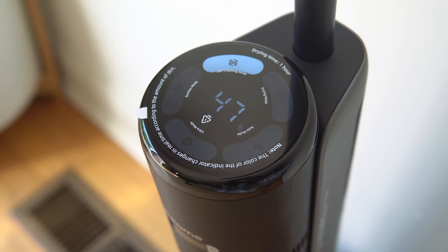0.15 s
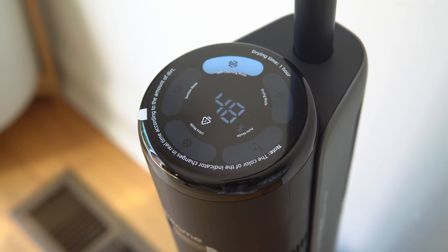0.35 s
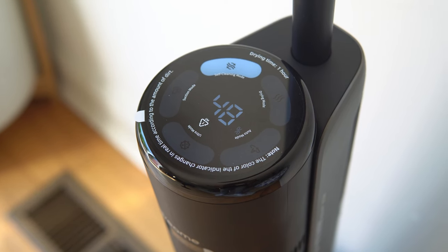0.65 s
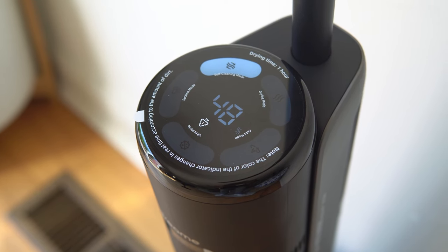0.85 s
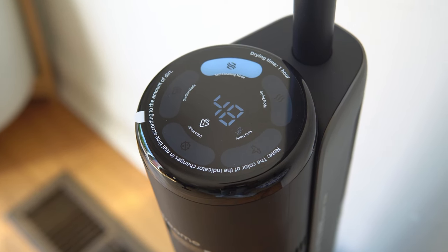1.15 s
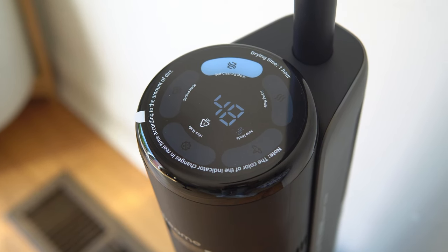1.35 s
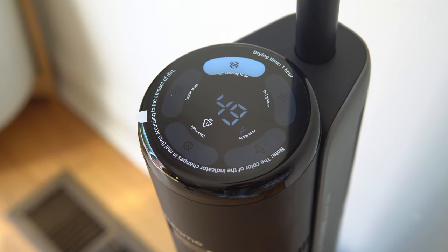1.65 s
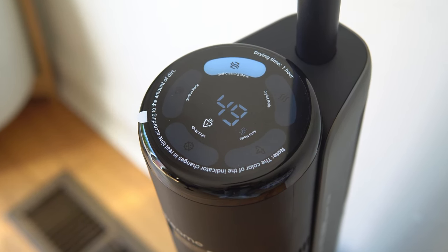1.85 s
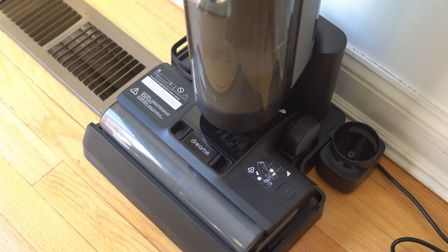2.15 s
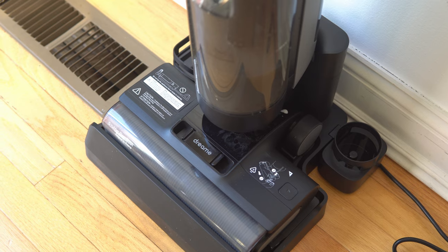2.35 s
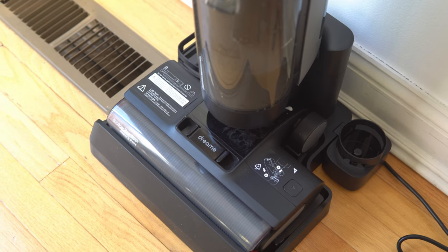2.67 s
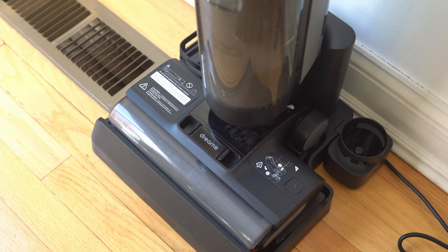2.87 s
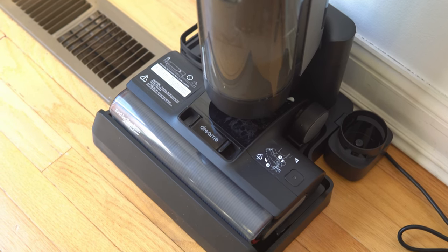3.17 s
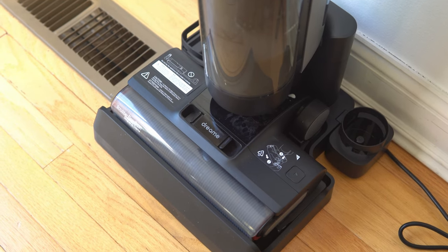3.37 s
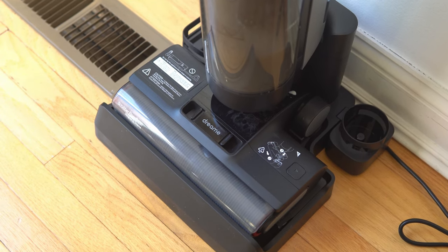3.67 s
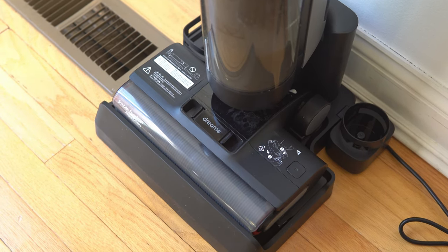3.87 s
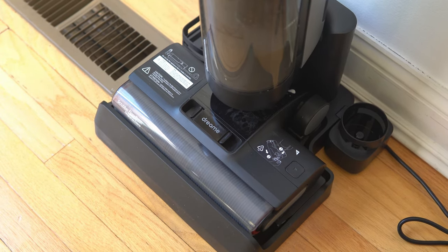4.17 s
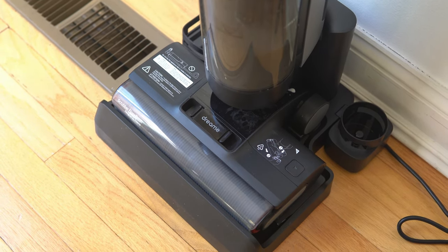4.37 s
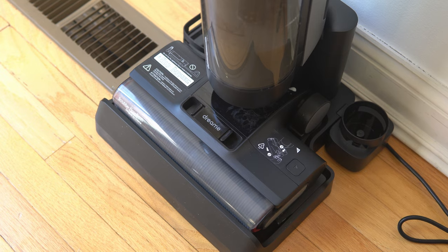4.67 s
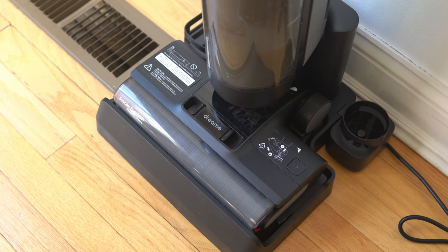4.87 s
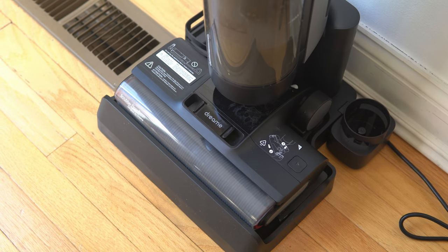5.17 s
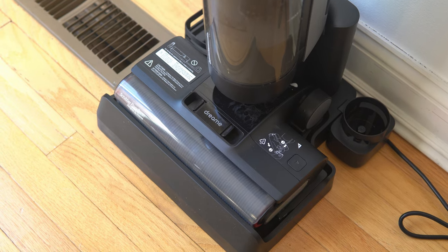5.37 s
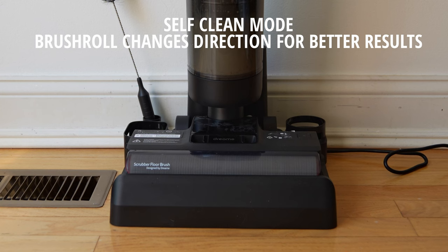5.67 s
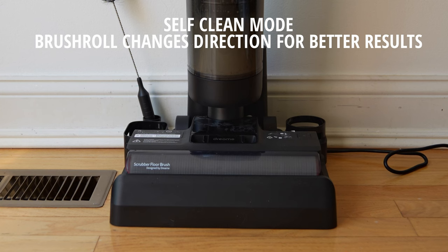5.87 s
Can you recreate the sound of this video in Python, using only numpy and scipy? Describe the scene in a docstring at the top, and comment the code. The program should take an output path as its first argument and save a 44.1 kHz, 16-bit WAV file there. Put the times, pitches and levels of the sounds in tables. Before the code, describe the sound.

From 0 to about 2.15 s the microphone is close to the handle of a floor washer drying on its base. A steady fan tone near 1.1 kHz wavers very slightly, under a thin whine around 10 kHz that is weaker on the left at first, then evens out. Broad duct air rushes around them, and one barely noticeable dull bump falls near 0.3 s. At 2.15 s it cuts abruptly to the floor head: a low gear hum near 215 Hz creeps up slightly, while the brush swishes about nine turns a second, with one and two swells per turn. Soft sagging bumps come around 2.7 and 3.1 s, clustering from 3.3 to 3.8 s; a brief dull rumble follows near 4.3 s. A faint thin motor whine grows on the right. At 5.43 s everything drops to a much quieter, slower fan with soft centred air, continuing to the end.

```python
"""A drying fan's tone, thin whine and rushing air open by the handle of a floor washer on its base station.
By the floor head, the geared motor hums and the brush swishes once and twice a turn; from the front
only a faint, slower fan remains. Rotating parts are sines locked to a turning angle, air and brush are
noise coloured by resonances, and a few soft bumps are short tones that sag in pitch."""
import sys
import numpy as np
from scipy import signal
from scipy.fft import rfft, irfft
from scipy.io import wavfile
from scipy.ndimage import uniform_filter1d

SR = 44100
rng = np.random.default_rng(int(sys.argv[2]) if len(sys.argv) > 2 else 0)


def int16_out(signal):
    """Quantize to a 16-bit WAV file."""
    q = np.round(np.clip(np.atleast_2d(signal).T, -1, 1) * 32767)
    wavfile.write(sys.argv[1], SR, q.astype(np.int16))


N = 265919
TIME = np.arange(N) / SR
BINS = np.fft.rfftfreq(N, 1 / SR)


def amp(db):
    """Decibels to gain."""
    return 10 ** (np.asarray(db) / 20)


def evened(x):
    """Scaled to rms 1 over all channels."""
    return x / np.sqrt(np.mean(x ** 2) + 1e-20)


def curves(rows):
    """Each column of a timed table, at every sample."""
    times, *columns = np.transpose(rows)
    return [np.interp(TIME, times, column) for column in columns]


def spectrum(points):
    """A table over frequency, at every bin, joined along a logarithmic pitch scale."""
    hz, value = np.transpose(points)
    return np.interp(np.log(BINS + 1), np.log(hz + 1), value)


def drift(rate_hz):
    """Slow random wander of rms 1, up to about this rate."""
    slow = np.exp(-(BINS / rate_hz) ** 2)
    return evened(irfft(rfft(rng.standard_normal(N)) * slow, N))


def panned(x, balance_db):
    """Two channels with this left-right difference and the same middle level."""
    left = amp(balance_db)
    return np.array([x * left, x]) * 2 / (1 + left)


def sine(angle):
    """A sine of rms 1."""
    return np.sqrt(2) * np.sin(angle)


def turning(hz):
    """Angle of something that turns at this rate [radians]."""
    return 2 * np.pi * np.cumsum(hz) / SR


def harmonics(angle, orders, flutter):
    """Lines locked to one rotation, each shaken a little in level by the air."""
    lines = 0
    for multiple, db, balance_db in orders:
        shaken = sine(multiple * angle) * (1 + flutter * drift(36))
        lines = lines + panned(amp(db) * shaken, balance_db)
    return lines


def band(x, hz, width):
    """The part of a sound around one frequency."""
    return irfft(rfft(x) * np.exp(-((BINS - hz) / width) ** 2), N)


def rush(shape, resonances, same, balance):
    """Turbulent noise of rms 1, coloured by cavities, at two microphones."""
    shared, separate = rfft(rng.standard_normal((2, N)))
    likeness = np.clip(spectrum(same), 0, 1)
    power = 1
    for hz, width, db in resonances:
        power = power + (amp(db) ** 2 - 1) / (1 + (2 * (BINS - hz) / width) ** 2) ** 2
    colour = amp(spectrum(shape)) * np.sqrt(np.maximum(power, .1))
    right = likeness * shared + np.sqrt(1 - likeness ** 2) * separate
    return evened(irfft(np.array([shared, right]) * panned(colour, spectrum(balance)), N))


def with_echo(angle, hz, null_hz, share):
    """A tone and its echo: weakest where the pitch meets the null, stronger as it moves away."""
    echo_delay_s = .0135
    lag = 2 * np.pi * (hz - null_hz) * echo_delay_s
    return sine(angle) - share * sine(angle - lag)


# The left microphone drifts out of a quiet spot:
# (time [s], whine level [dB], echo share [0-1], lead over the right [radians])
LEFT_WHINE_PATH = [(.5, -45, 0.4, -0.65), (1.03, -49.5, 0.8, -0.69), (1.13, -42, 0.6, -2.5),
                   (1.27, -42.5, 0.07, -0.46), (2.0, -41.5, 0, 1.4), (2.13, -40, 0, 0)]
WHINE_ORDER = 9  # multiple of the blade tone


def fan_whine(angle, blade_hz):
    """The thin whine meets its own echo, which cancels it most at one pitch for each microphone."""
    whine_angle, whine_hz = WHINE_ORDER * angle, WHINE_ORDER * blade_hz
    left_db, left_echo, lead = curves(LEFT_WHINE_PATH)
    left = amp(left_db) * with_echo(whine_angle + lead, whine_hz, null_hz=10038, share=left_echo)
    right = amp(-41.8) * with_echo(whine_angle, whine_hz, null_hz=10022, share=.3)
    return np.array([left, right]) * (1 + 0.031 * drift(60))


# Air through the ducts, relative: (frequency [Hz], level [dB per Hz])
AIR_SHAPE = [(20, -20), (45, -11), (95, -8.5), (170, -7), (260, -2.5), (800, -.5), (1400, 0.5), (1900, -3),
             (2800, -5), (4000, -7.5), (6500, -9), (8200, -7.5), (10000, 1.5), (15700, -10.5)]
# Duct resonances: (frequency [Hz], width [Hz], lift [dB])
DUCT_RESONANCES = [(138.5, 16.5, 17), (316, 21, 8.5), (355, 26, 8), (401.5, 17, 7.5), (510, 10, 9),
                   (650, 34, 13.5), (737, 35, 6), (868, 48, 6), (2170, 140, 9), (2410, 340, 8.5),
                   (7150, 330, 4.5), (8830, 1500, 3), (11000, 810, 2.5)]
# Likeness of the air at the two microphones: (frequency [Hz], likeness [0-1])
AIR_LIKENESS = [(130, 0.99), (640, 0.95), (1400, 0.74), (3100, 0.79), (6800, 0.2), (10000, 0.067),
                (15000, 0.34)]
# Left-right balance of the air: (frequency [Hz], left over right [dB])
AIR_SIDES = [(500, 0), (1100, -1), (2400, -4), (4000, 0.5), (9000, -1), (15000, -0.5)]


def duct_air():
    """Turbulent air rings the duct's resonances and flutters at the outlet."""
    air = rush(AIR_SHAPE, DUCT_RESONANCES, AIR_LIKENESS, AIR_SIDES) * amp(-43.5 + 0.52 * drift(44))
    outlet_flutter = amp(1.7 * drift(35)) - 1
    return air + band(air, hz=2430, width=260) * outlet_flutter


# The fan hunts around its set speed: (time [s], blade tone [Hz])
FAN_HUNTING = [(0.0, 1117.6), (0.13, 1116.2), (0.33, 1118.2), (0.49, 1113.6), (0.8, 1117.9), (1.0, 1115.9),
               (1.12, 1112.6), (1.3, 1118.2), (1.44, 1118.7), (1.65, 1115.2), (1.88, 1115.4),
               (2.03, 1113.6), (2.14, 1116.5)]
# Fan harmonics beside the whine: (multiple of the blade tone, level [dB], left over right [dB])
FAN_HARMONICS = [(1, -43, -7.5), (2, -66, 5), (3, -71.5, -9), (4, -70.5, -5), (10, -63.5, -5)]


def drying_fan():
    """A blade tone whose speed hunts slightly, moving its whine into and out of the echo's null."""
    rounded_by_inertia = uniform_filter1d(curves(FAN_HUNTING)[0], size=2600)
    angle = turning(rounded_by_inertia * (1 + 0.00011 * drift(50)))
    tone = harmonics(angle, FAN_HARMONICS, flutter=0.073)
    return tone + fan_whine(angle, rounded_by_inertia) + duct_air()


def low_hum(hz, db):
    """A faint drone in the room, a sine that wavers slightly in pitch."""
    return amp(db) * sine(turning(hz * (1 + 0.0036 * drift(3))))


# Soft, dull bumps: (time [s], pitch before wander, at mid-bump [Hz], peak level [dB])
BUMP_HITS = [(0.327, 200, -54), (2.685, 241, -53), (3.113, 260, -51.5), (3.32, 280, -55),
             (3.503, 243.7, -45.5), (3.594, 252.4, -46), (3.698, 244.7, -49), (3.795, 228.5, -45.5)]
BUMP_S, BUMP_SAG_HZ_PER_S = 0.058, 500


def bumps():
    """Short, dull tones that sag in pitch, several close enough to the gear hum to beat with it."""
    out = np.zeros(N)
    for at, hz, db in BUMP_HITS:
        swell = np.exp(-(2 * (TIME - at) / BUMP_S) ** 2)
        pitch = hz * (1 + 0.0247 * drift(28.7)) - BUMP_SAG_HZ_PER_S * (TIME - at)
        out += amp(db) * swell * sine(turning(pitch))
    return out


# Loudness of the gear tone: (time [s], level [dB])
GEAR_LOUDNESS = [(2.16, -49.5), (2.7, -47), (4.2, -47), (5.42, -48)]
# Gear harmonics: (multiple of the gear tone, level re GEAR_LOUDNESS [dB], left over right [dB])
GEAR_HARMONICS = [(1, 0.5, 1), (2, -10.5, 1.5), (4, -23.5, 1)]


def gear_hum(angle):
    """Meshing gear teeth hum at the tooth rate and its multiples."""
    return amp(curves(GEAR_LOUDNESS)[0]) * harmonics(angle, GEAR_HARMONICS, flutter=0.052)


# Brush rubbing, relative: (frequency [Hz], level [dB per Hz])
BRUSH_SHAPE = [(20, -28), (45, -6), (95, -3.5), (165, -1.5), (235, 0), (420, -2), (600, -9.5), (1000, -7.5),
               (2000, -4.5), (3600, -6), (4700, -19), (7000, -22.5), (9000, -36.5), (15700, -49)]
# Floor head resonances: (frequency [Hz], width [Hz], lift [dB])
HOUSING_RESONANCES = [(128.3, 18, 9.5), (136, 18.6, 12.5), (186.5, 14.4, 10), (463, 30, 4.5),
                      (640, 13, 10.5), (840, 93, 5), (1267, 280, 6), (1610, 110, 7.5), (1802, 87, 7.5),
                      (1968, 170, 9.5), (2286, 180, 7.5), (2802, 94, 6), (3223, 20, 9), (10130, 1600, 7)]
# Likeness of the brush at the two microphones: (frequency [Hz], likeness [0-1])
BRUSH_LIKENESS = [(130, 0.99), (640, 0.93), (1400, 0.83), (3100, 0.75), (6800, 0.4), (15000, 0.13)]
# Left-right balance of the brush: (frequency [Hz], left over right [dB])
BRUSH_SIDES = [(600, -0.5), (1100, -3.5), (2000, -1), (3500, -1.5), (5500, 1.5), (12000, -2.5)]
# Bands that swell with the roller: (frequency [Hz], width [Hz], swells a turn, depth [dB], phase [radians])
BRUSH_SWELLS = [(130, 50, 1, 2.1, 1.7), (130, 50, 2, 2.6, 1.9), (1950, 450, 1, 2.1, -.7),
                (1950, 1600, 2, .9, .6)]


def brush_swish(turn):
    """The brush rubs unevenly, so bands of its noise swell in step with the roller's turn."""
    brush = rush(BRUSH_SHAPE, HOUSING_RESONANCES, BRUSH_LIKENESS, BRUSH_SIDES) * amp(-47.5 + .5 * drift(52))
    for hz, width, per_turn, depth_db, phase in BRUSH_SWELLS:
        swell = amp(depth_db * np.sin(per_turn * turn + phase))
        brush = brush + band(brush, hz, width) * (swell - 1)
    return brush


# Loudness of the motor whine: (time [s], level [dB])
MOTOR_WHINE_LOUDNESS = [(2.16, -76), (3.0, -71), (3.9, -75), (4.4, -71), (4.7, -65), (5.43, -64)]


def motor_whine(angle):
    """A thin motor tone at 20 times the gear tone, stronger on the right."""
    return panned(amp(curves(MOTOR_WHINE_LOUDNESS)[0]) * sine(20 * angle), balance_db=-7.0)


# The roller drive speeds up slightly: (time [s], gear tone [Hz])
GEAR_SPEED = [(2.3, 213.0), (3.8, 214.9), (5.25, 216.0)]
TEETH = 24  # gear tone cycles per roller turn


def roller():
    """One turning drive sets the gear hum, the brush swish and the motor whine together."""
    angle = turning(curves(GEAR_SPEED)[0] * (1 + 0.00187 * drift(17.0)))
    return gear_hum(angle) + brush_swish(angle / TEETH) + motor_whine(angle)


def brief(at, length):
    """A smooth, flat-topped rise and fall around one moment."""
    return np.exp(-(2 * (TIME - at) / length) ** 4)


def faint_hiss(at, length, hz, width, db):
    """A thin, airy band of noise that comes and goes, independent in each ear."""
    pair = evened(band(rng.standard_normal((2, N)), hz, width))
    return amp(db) * brief(at, length) * pair


def low_rumble(at, length, hz, width, db):
    """A brief, dull band of noise, alike in both ears."""
    noise = evened(band(rng.standard_normal(N), hz, width))
    return amp(db) * brief(at, length) * noise


IDLE_HZ = 883  # slow fan's blade tone
# Slow fan harmonics: (multiple of the blade tone, level [dB])
IDLE_HARMONICS = [(1, -67.5), (4, -86), (9, -71.5)]
# Slow fan's air, relative: (frequency [Hz], level [dB per Hz])
IDLE_AIR_SHAPE = [(30, -25), (70, -15.5), (130, -10.5), (950, -2.5), (1500, -11.5), (2750, -0.5),
                  (4300, -2.5), (5400, -15), (7200, -10.5), (9400, -12.5), (10600, -19), (11400, -13),
                  (12900, -34), (15700, -32)]
# Its duct resonances: (frequency [Hz], width [Hz], lift [dB])
IDLE_RESONANCES = [(120, 25, 10.5), (313, 23, 9), (443, 16, 9), (550, 30, 7), (1140, 22, 12.5),
                   (2900, 600, 2), (5990, 270, 11)]


def slow_fan():
    """The quiet fan from the front: faint blade harmonics and air, alike in both ears."""
    angle = turning(IDLE_HZ * (1 + 0.00023 * drift(9.5)))
    centred = [(multiple, db, 0) for multiple, db in IDLE_HARMONICS]
    air = rush(IDLE_AIR_SHAPE, IDLE_RESONANCES, same=[(1, 1)], balance=[(1, 0)])
    return harmonics(angle, centred, flutter=0.049) + amp(-65.0) * air


def cut(at):
    """A quick 3 ms switch from 0 to 1."""
    return np.clip((TIME - at) / .003 + .5, 0, 1)


def scene():
    """Three listening places, joined by quick cuts."""
    handle = drying_fan() + low_hum(hz=56.2, db=-68)
    knocks = bumps()
    head = roller() + low_hum(hz=56.8, db=-71.0)
    head = head + faint_hiss(at=3.64, length=.45, hz=12400, width=900, db=-82)
    head = head + low_rumble(at=4.27, length=.22, hz=290, width=53, db=-52)
    front = slow_fan()
    to_head, to_front = cut(2.157), cut(5.427)
    return (1 - to_head) * handle + (to_head - to_front) * head + to_front * front + knocks


def record(dry):
    """A steep low-pass removes the treble above its edge."""
    edge_hz = 15800
    lowpass = signal.firwin(511, edge_hz, window=("kaiser", 9), fs=SR)
    return signal.oaconvolve(dry, lowpass[None], "same")


dry = scene()
out = record(dry)
int16_out(out)
```